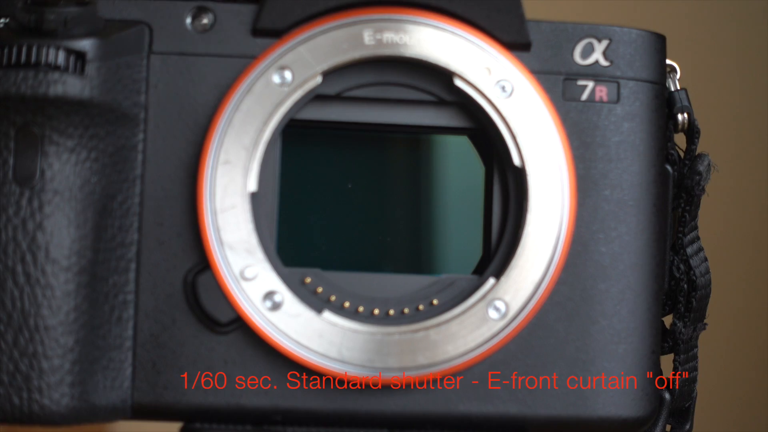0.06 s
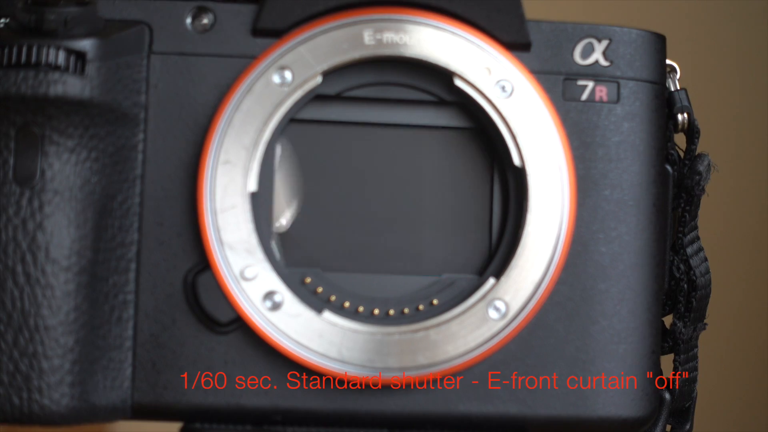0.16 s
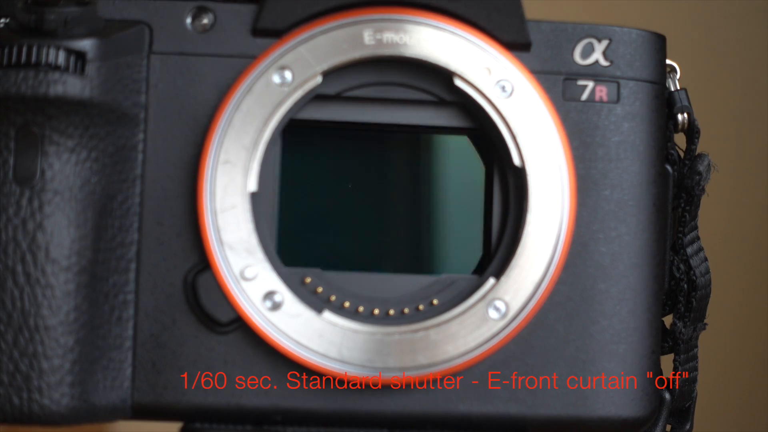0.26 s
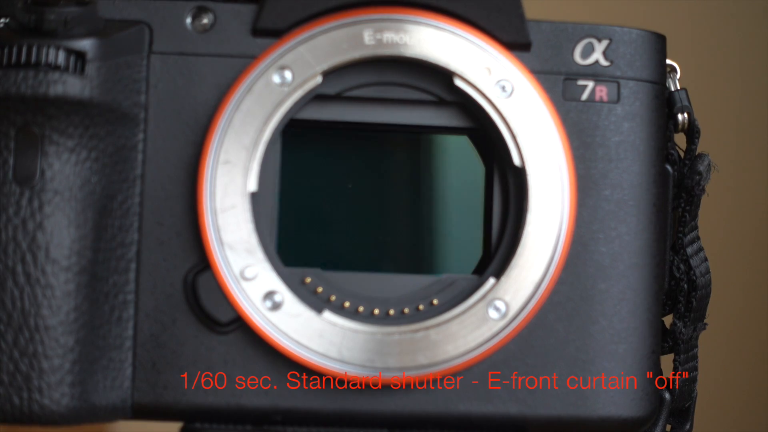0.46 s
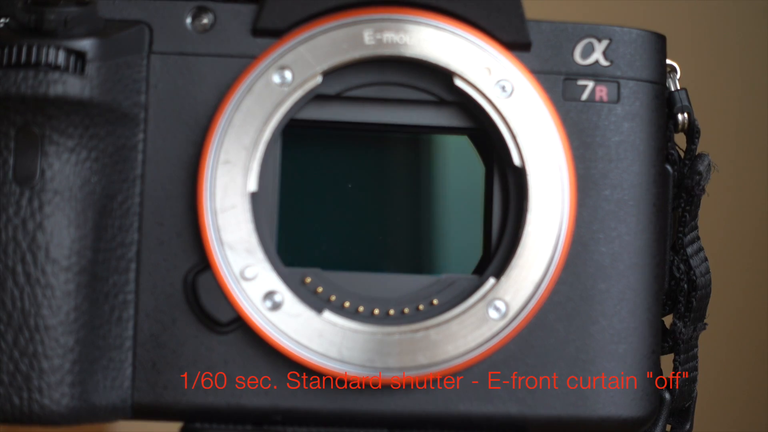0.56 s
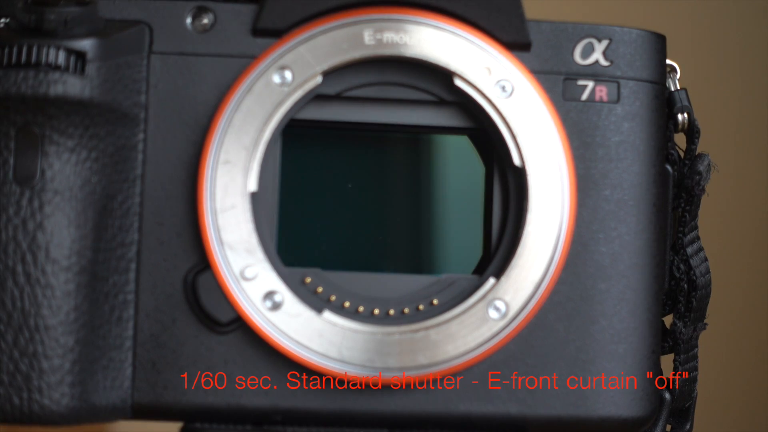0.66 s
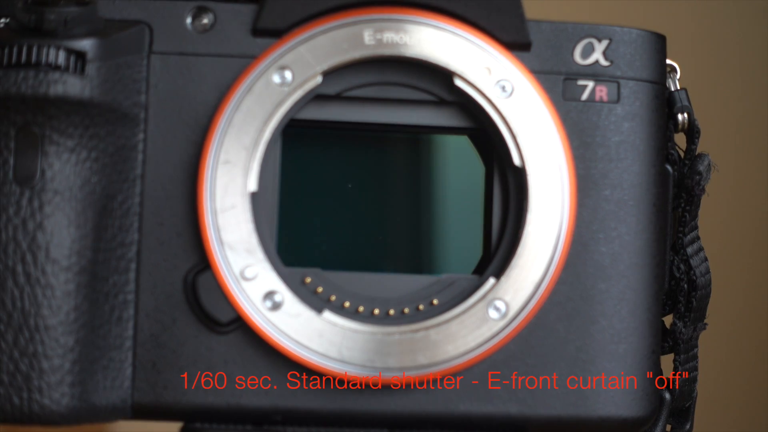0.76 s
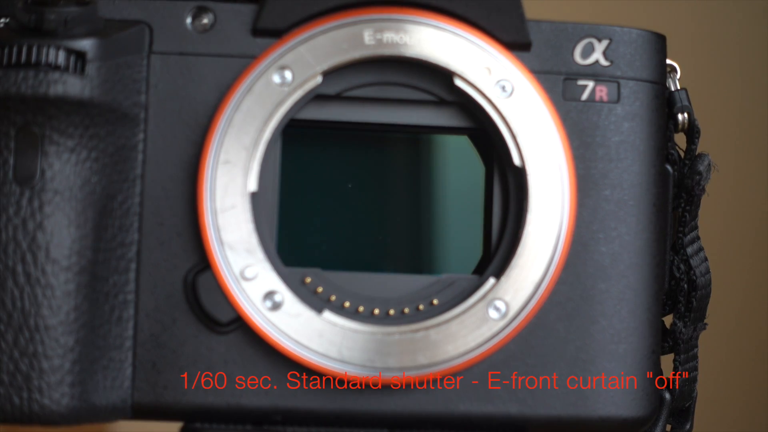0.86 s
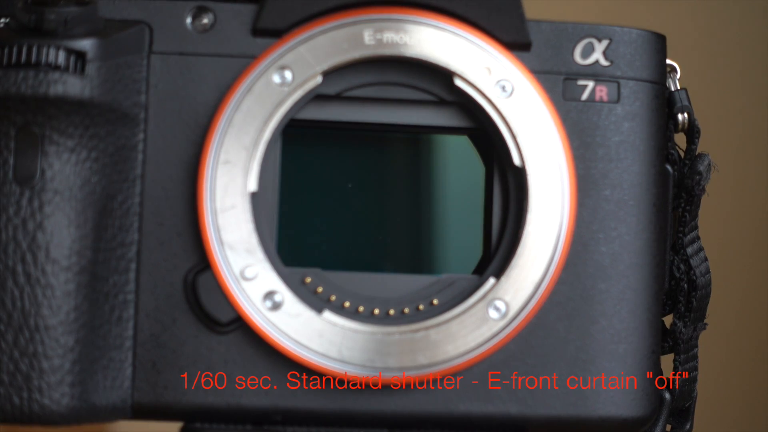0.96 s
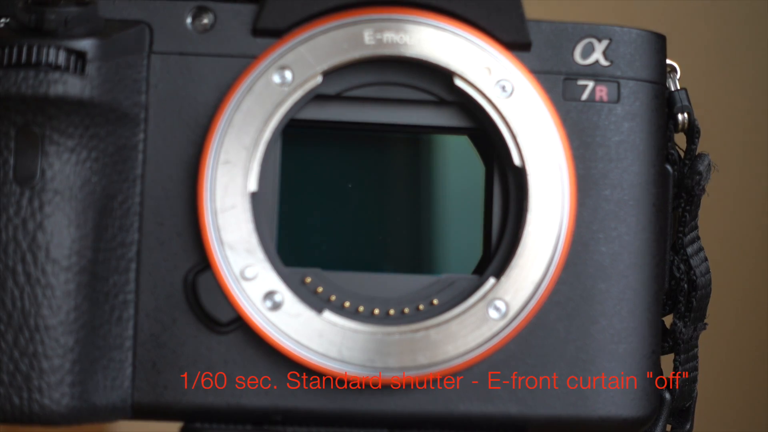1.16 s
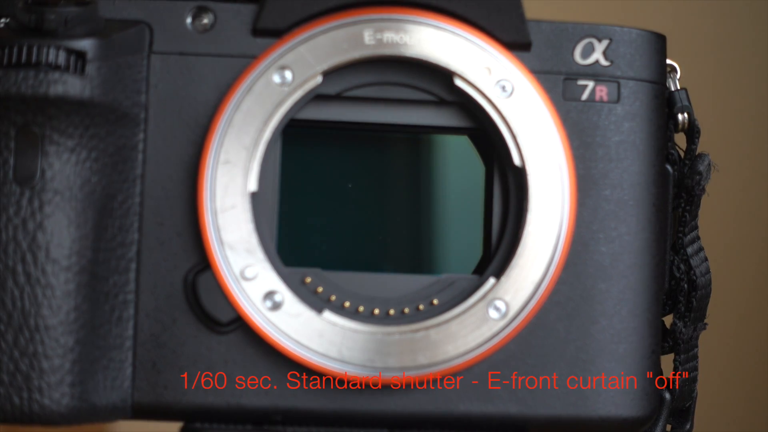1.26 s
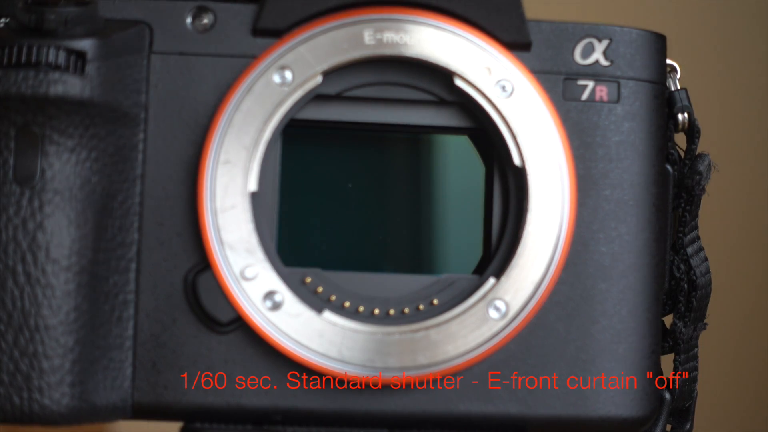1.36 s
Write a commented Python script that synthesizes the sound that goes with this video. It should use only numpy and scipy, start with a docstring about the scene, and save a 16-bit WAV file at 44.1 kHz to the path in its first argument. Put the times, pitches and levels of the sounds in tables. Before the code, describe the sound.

Single close camera shutter release: rapid metallic clicks and short motor zips in a quiet room

```python
"""A camera's focal-plane shutter fires a metre or two from the microphones in a quiet, hard-walled room.
Blade curtains slap their stops and levers knock the body, as coloured noise bursts; the frame rings as a sine.
A small motor cocks the mechanism twice, whining in gliding harmonics over grainy gear noise.
A wall behind throws a blurred echo and the room rings on as decaying noise. Parts rustle faintly at first,
a tiny tick comes late from the left; mains hum and air noise lie underneath."""
import sys
import numpy as np
from scipy import signal
from scipy.fft import rfft, irfft, next_fast_len
from scipy.io import wavfile
from scipy.ndimage import map_coordinates

SR = 44100
rng = np.random.default_rng(int(sys.argv[2]) if len(sys.argv) > 2 else 0)


def inscribe(sig):
    """Save sig as 16-bit PCM at rate SR to the path in sys.argv[1].

    A 1-D sig is mono; a 2-D sig holds one channel per row.
    Samples are clipped to [-1, 1] before scaling.
    """
    pcm = np.round(np.clip(np.atleast_2d(sig).T, -1, 1) * 32767)
    wavfile.write(sys.argv[1], SR, pcm.astype(np.int16))


def boost(x):
    """Linear amplitude factor 10**(x/20) for a level x in decibels (scalar or array-like)."""
    u = np.asarray(x, float) / 20
    return 10 ** u


N = 61739  # length in samples

# curtains slapping their stops: t/s, typical peak/dB, length/s, frame ring/dB
CURTAIN_SLAPS = [(0.232, -20, .0002, -54), (0.246, -21, 0.0031, -45.5), (.3027, -22, 0.0029, -59.5),
                 (0.3104, -9.5, 0.0046, -30.5), (0.494, -23, .003, -57), (0.5045, -21.5, .003, -55),
                 (0.5128, -7.5, 0.0057, -49)]
SLAP_RISE_S = 0.0001
TOP_HZ = 15900  # top of the band


def unit(x):
    """Scale to rms 1."""
    return x / np.sqrt(np.mean(x ** 2) + 1e-20)


def along(points, hz):
    """Read (f/Hz, value) points on a log frequency axis."""
    f, v = np.transpose(points)
    return np.interp(np.log(hz + 1), np.log(f + 1), v)


def curve(rows):
    """One value per sample from (t/s, value) rows."""
    return np.interp(np.arange(N) / SR, *np.transpose(rows))


def wobble(rate, size=N):
    """A smooth random curve with rate knots a second."""
    knots = rng.standard_normal(int(size * rate / SR) + 4)
    return map_coordinates(knots, [np.arange(size) * rate / SR])


def filtered(x, gain):
    """x through a causal minimum-phase filter with the given gain of frequency."""
    n = x.shape[-1]
    m = 2 * next_fast_len(n // 2 + 4096)
    cepstrum = irfft(np.log(gain(np.fft.rfftfreq(m, 1 / SR)) + 1e-5), m)
    # fold the cepstrum forward in time: same gain, no pre-ringing
    cepstrum[1:m // 2] *= 2
    cepstrum[m // 2 + 1:] = 0
    return irfft(rfft(x, m) * np.exp(rfft(cepstrum)), m)[..., :n]


def peaks(table, hz):
    """Gain of a flat response with resonant peaks added in power."""
    return np.sqrt(1 + sum(boost(db) ** 2 / (1 + (2 * (hz - c) / w) ** 2) for c, w, db in table))


def grit(level, colour, lumpy_db):
    """Grainy friction: coloured noise with fast and slow random lumps, under a level curve."""
    lumps = boost(3 * wobble(900) + lumpy_db * wobble(150))
    x = lumps * rng.standard_normal(N)
    return boost(curve(level)) * unit(filtered(x, lambda hz: boost(along(colour, hz))))


def blow(length, rise, gain):
    """A few milliseconds of gritty rattling contact, coloured, typical peak 1."""
    sag_s, fall_s = 0.007, 0.0008
    grit_db = 2  # scatter of the contacts
    t = np.arange(1024) / SR
    attack = 1 - np.exp(-t / rise)
    release = 1 + np.exp(np.minimum((t - length) / fall_s, 50))
    shape = attack * np.exp(-t / sag_s) / release
    rattle = boost(grit_db * wobble(2500, size=len(t))) * rng.standard_normal(len(t))
    x = filtered(shape * rattle, gain)
    return x / np.linalg.norm(x) * np.sqrt(np.sum(shape ** 2)) / 2


def background():
    """Air noise, near mono in the lows and wider in the treble, with narrow wavering hum bands."""
    # air colour: f/Hz, level/dB
    air_colour = [(18, -93), (30, -57.5), (109, -8.5), (132, -22), (163, -19.5), (350, -10), (533, -13),
                  (659, -12), (1180, -12), (4650, -20.5), (7670, -27.5), (15200, -36.5), (16500, -49)]
    # side over mid: f/Hz, level/dB
    air_side = [(60, -29.5), (110, -42.5), (200, -23), (380, -15), (700, -6.5), (1290, -5), (2380, 1),
                (4400, -3), (8120, 1.5), (15000, 6.5)]
    # hum bands: f/Hz, width/Hz, level before the swell/dB, waver/dB
    hum_bands = [(120.2, 4.2, -73.5, 1.3), (97, 18, -83, 3.4), (352, 25, -72.5, 3.5), (454, 9.3, -78.5, 3)]
    # swell of the whole hum, used relative to its mean: t/s, level/dB
    hum_swell = [(0.0, -77), (0.204, -76.5), (0.308, -71), (0.874, -73), (1.39, -77)]
    air_db = -65.5  # rms of the mid
    a, b = rng.standard_normal((2, N))
    mid = filtered(a, lambda hz: boost(along(air_colour, hz)))
    side = filtered(b, lambda hz: boost(along(air_colour, hz) + along(air_side, hz)))
    air = boost(air_db) * np.array([mid + side, mid - side]) / np.std(mid)
    t = np.arange(N) / SR
    hum = np.zeros(N)
    for hz, width, db, waver_db in hum_bands:
        strength = boost(db + waver_db * wobble(width)) * np.sqrt(2)
        hum += strength * np.sin(2 * np.pi * hz * t + 1.3 * wobble(width))
    swell = curve(hum_swell)
    return air + boost(swell - swell.mean()) * hum


def rustle():
    """Parts releasing: faint friction noise that swells up to the first blows."""
    # rise and end of the rustle: t/s, level/dB
    rustle_level = [(.18, -92), (.19, -61.5), (.2, -53.5), (.21, -51), (.225, -45), (.236, -45),
                    (.244, -85)]
    # its colour: f/Hz, level/dB
    rustle_colour = [(710, -49), (1200, -21.5), (4050, -0.5), (4990, -23), (5950, -9), (7490, -11.5),
                     (9130, -10), (15400, -22.5), (16500, -37)]
    return grit(rustle_level, rustle_colour, lumpy_db=2)


def tail(t60s):
    """Room ringing: noise that dies band by band after a short build-up, energy 1."""
    build_s = 0.0098
    hz, t, z = signal.stft(rng.standard_normal(SR), SR, nperseg=256)
    decay = boost(-60 * t / along(t60s, hz)[:, None])
    x = signal.istft(z * decay, SR, nperseg=256)[1][:SR]
    x = x * (1 - np.exp(-(np.arange(SR) / SR / build_s) ** 2))
    return x / np.linalg.norm(x)


def wall():
    """Echo of the wall behind: one clean inverted return, with the treble blurred around it."""
    # what the wall returns best: f/Hz, level/dB
    echo_tilt = [(500, -3), (1200, 7.5), (2000, 6.5), (2700, -2.5), (5000, -1), (9000, -2.5), (12000, -2.5),
                 (16000, -2.5)]
    echo_s, blur_s = 0.0154, 0.00084
    blur_hz = 2950  # the blur fades out below this
    t = np.arange(SR // 10) / SR
    blur = rng.standard_normal(len(t)) * np.exp(-np.abs(t - echo_s) / blur_s)
    x = filtered(blur, lambda hz: 1 / (1 + (blur_hz / (hz + 1)) ** 4))
    x = x / np.linalg.norm(x)
    x[round(echo_s * SR)] -= 0.7
    return filtered(x / np.linalg.norm(x), lambda hz: boost(along(echo_tilt, hz)))


def room(x):
    """On axis: wall echo and front-back ringing, fed by the shell. All round: near scatter, slower tail."""
    # shell resonances, radiated sideways and back into the room: f/Hz, width/Hz, level/dB
    shell_peaks = [(1237, 150, 6.5), (1896, 120, 8), (2090, 180, 9.5), (5247, 200, 12.5), (6380, 360, 5),
                   (9350, 190, 2)]
    # broad tilt of the shell: f/Hz, level/dB
    shell_tilt = [(500, -6), (900, -3), (1250, 1), (1620, -6.5), (2200, -3.5), (4000, -4.5), (9000, -1),
                  (12000, -3), (16000, 6.5)]
    # front-back ringing: f/Hz, t60/s
    ringing = [(500, 0.77), (2000, 0.46), (5000, 0.5), (9000, 0.41), (15000, .3)]
    # slower tail from all round: f/Hz, t60/s
    diffuse = [(500, .7), (2500, 1), (6000, 0.92), (10000, 0.63), (15000, 0.7)]
    # what feeds that tail: f/Hz, level/dB
    diffuse_colour = [(500, -16.5), (1200, -19.5), (3000, -17.5), (6000, -16), (10000, -22), (15000, -19)]
    # its side under its mid: f/Hz, level/dB
    diffuse_side = [(500, 0.5), (1500, -10), (3000, -2), (8000, 3), (15000, 1)]
    # side level of the near scatter: f/Hz, level/dB
    scatter_side = [(500, -25), (1500, -34), (3000, -22.5), (5000, -14), (14000, -11.5)]
    ringing_db, echo_db = -3, -2.5
    near_s = 0.002  # decay of scatter off things close to the microphones

    def heard(v, answer):
        return signal.fftconvolve(v, answer)[:N]

    t = np.arange(SR) / SR
    near = rng.standard_normal(SR) * np.exp(-t / near_s)
    shell = filtered(x, lambda hz: boost(along(shell_tilt, hz)) * peaks(shell_peaks, hz))
    around = filtered(x, lambda hz: boost(along(diffuse_colour, hz)))
    mid = heard(shell, boost(ringing_db) * tail(ringing))
    mid += heard(shell, boost(echo_db) * wall())
    mid += heard(around, tail(diffuse))
    # a fresh tail for the side keeps it independent of the mid
    side = filtered(heard(around, tail(diffuse)), lambda hz: boost(along(diffuse_side, hz)))
    scatter = heard(x, near / np.linalg.norm(near))
    side += filtered(scatter, lambda hz: boost(along(scatter_side, hz)))
    return np.array([mid + side, mid - side])


def motor():
    """The whine starts high, then sags and fades as the spring load builds; the gears grind."""
    # runs: start/s, stop/s, free f/Hz, loaded f/Hz, sag time/s, level before colour/dB, fade/(dB/s)
    motor_runs = [(0.24, .308, 4086, 3695, 0.0089, -31.5, 106.5),
                  (0.442, 0.508, 4135, 3130, 0.019, -30.5, 78)]
    # colour of the whine's harmonics: f/Hz, level/dB
    whine_colour = [(3100, -16), (3700, -10), (6300, 0), (7400, -1), (9400, -2), (11100, 1), (12000, -2),
                    (12600, -10), (13500, -10), (15000, -12), (16000, -16)]
    # grinding of the gear train: t/s, level/dB
    grind_level = [(.222, -76.5), (.24, -48.5), (.255, -37.5), (.3, -41), (.33, -38), (.42, -45),
                   (.45, -31.5), (.51, -37.5), (.54, -33.5), (.555, -28), (.57, -73.5)]
    # its colour: f/Hz, level/dB
    grind_colour = [(290, -76), (500, -37), (1280, -8), (2100, -1.5), (2650, -6.5), (3880, -6), (4690, -23),
                    (7490, -5.5), (15300, -11.5), (16500, -41)]
    waver_db = 3.5
    jitter = 0.0015  # fraction of the pitch
    t, out = np.arange(N) / SR, np.zeros(N)
    for start, stop, free_hz, load_hz, sag, db, fade_db in motor_runs:
        age = np.clip(t - start, 0, 1)
        pitch = load_hz + (free_hz - load_hz) * np.exp(-(age / sag) ** 1.5)
        phase = 2 * np.pi * np.cumsum(pitch * (1 + jitter * wobble(300))) / SR
        gate = np.clip(age / 0.0025, 0, 1) * np.clip((stop - t) / 0.003, 0, 1)
        whine = np.zeros(N)
        for k in range(1, 6):
            strength = boost(along(whine_colour, k * pitch) + waver_db * wobble(150))
            whine += strength * (k * pitch < TOP_HZ) * np.sin(k * phase)
        out += gate * boost(db - fade_db * age) * whine
    return out + grit(grind_level, grind_colour, lumpy_db=2.5)


def knocks():
    """Levers strike the body: resonant noise bursts, each with its own thud and treble."""
    # knocks: t/s, typical peak/dB, length/s, thud/dB, treble/dB
    lever_knocks = [(0.2276, -23.5, 0.0036, 0, 8.5), (0.2408, -24, 0.0025, 7, -12),
                    (0.3423, -17.5, 0.0022, 5.5, -9.5), (0.347, -6.5, 0.0041, 5, 8),
                    (0.3791, -4.5, 0.0042, 5.5, -1), (0.4528, -13.5, 0.0035, 12.5, -13.5),
                    (0.546, -14, 0.0017, 7, -7), (0.5508, -4, 0.0026, 1.5, 4.5)]
    # common colour: f/Hz, level/dB
    knock_colour = [(100, -83), (400, -35), (750, -19.5), (1200, -7.5), (1620, -16.5), (2100, -4),
                    (3200, -2), (6200, -3.5), (10200, -5), (13800, -12), (16000, -12), (16800, -20.5)]
    # resonances of the levers: f/Hz, width/Hz, level/dB
    lever_peaks = [(2535, 400, 4.5), (4245, 710, -15), (5150, 430, -8.5), (7880, 480, 6), (13500, 720, 5.5)]
    rise_s, thud_hz, treble_hz = 0.0008, 1800, 9800
    out = np.zeros(N + SR)
    for s, db, length, thud_db, treble_db in lever_knocks:
        def gain(hz):
            thud = thud_db / (1 + (hz / thud_hz) ** 4)
            treble = treble_db / (1 + (treble_hz / (hz + 1)) ** 4)
            return boost(along(knock_colour, hz)) * peaks(lever_peaks, hz) * boost(thud + treble)

        x = blow(length, rise_s, gain)
        out[round(s * SR):][:len(x)] += boost(db) * x
    return out[:N]


def slaps():
    """Blade curtains hit their stops: bright noise bursts with a very fast rise."""
    # colour: f/Hz, level/dB
    slap_colour = [(100, -78), (400, -51), (720, -16.5), (1000, -23.5), (2600, -12.5), (3350, -3.5),
                   (5600, -4.5), (6900, -1.5), (8300, -3), (12000, -1.5), (15500, -12.5), (16500, -19)]
    out = np.zeros(N + SR)
    for s, db, length, _ in CURTAIN_SLAPS:
        x = blow(length, SLAP_RISE_S, lambda hz: boost(along(slap_colour, hz)))
        out[round(s * SR):][:len(x)] += boost(db) * x
    return out[:N]


def frame():
    """The shutter frame rings briefly on one note, a decaying sine, from each slap."""
    ring_hz, t60_s, rise_s = 1317, 0.16, 0.002
    out, t = np.zeros(N + SR), np.arange(SR // 2) / SR
    ring = boost(-60 * t / t60_s) * (1 - np.exp(-t / rise_s)) * np.sin(2 * np.pi * ring_hz * t)
    for s, _, _, ring_db in CURTAIN_SLAPS:
        out[round(s * SR):][:len(t)] += boost(ring_db) * ring
    return out[:N]


def tick():
    """One tiny tick beside the camera: a short noise burst, louder on the left."""
    # colour: f/Hz, level/dB
    tick_colour = [(1500, -21.5), (3000, 15), (5000, -18), (8000, -6), (12000, -18)]
    start_s, level_db, pan_db = 1.0735, -53, 6
    x = blow(0.0034, SLAP_RISE_S, lambda hz: boost(along(tick_colour, hz)))
    x = np.pad(x, (round(start_s * SR), N))[:N]
    return boost(level_db + np.array([[pan_db], [-pan_db]])) * x


def scene():
    """Shutter, its room and the background."""
    shutter = slaps() + knocks() + motor() + rustle()
    return shutter + frame() + room(shutter) + tick() + background()


def top_cut(x):
    """Nothing passes above the cut-off."""
    return signal.sosfilt(signal.butter(12, 17070, fs=SR, output="sos"), x)


def record(dry):
    """Limit the band: nothing from TOP_HZ up passes."""
    spectrum = rfft(dry, axis=1) * (np.fft.rfftfreq(N, 1 / SR) < TOP_HZ)
    mix = irfft(spectrum, N, axis=1)
    return top_cut(mix)


dry = scene()
out = record(dry)
inscribe(out)
```